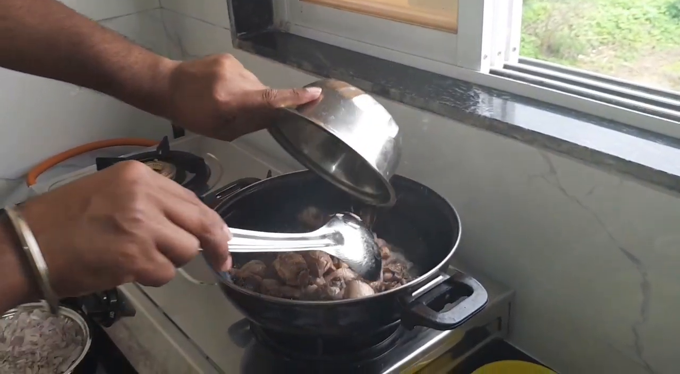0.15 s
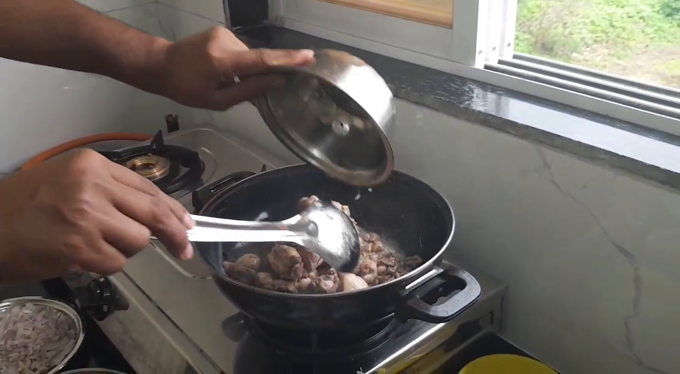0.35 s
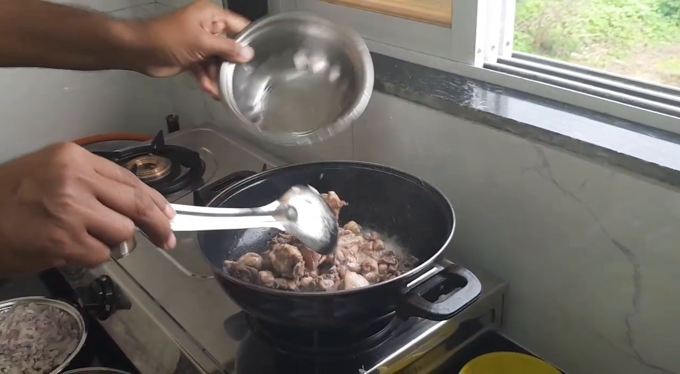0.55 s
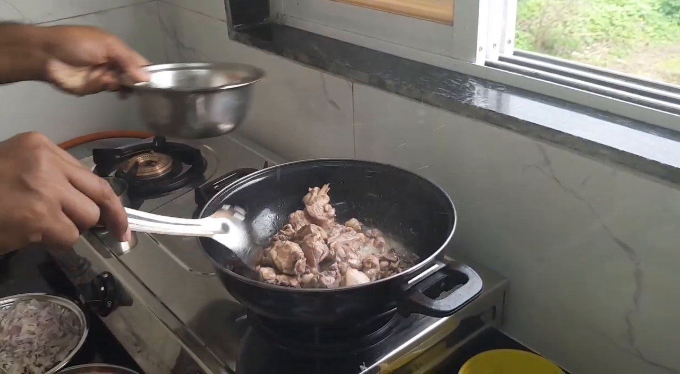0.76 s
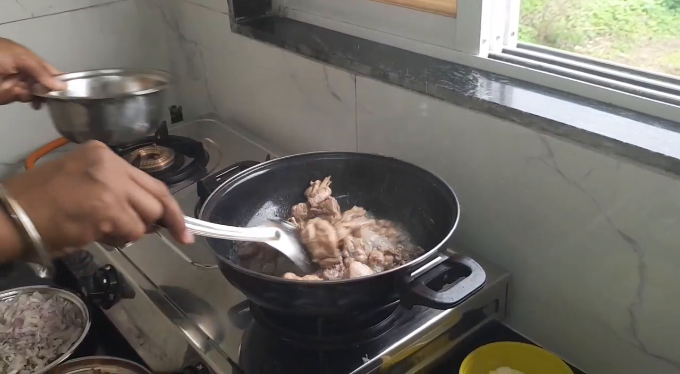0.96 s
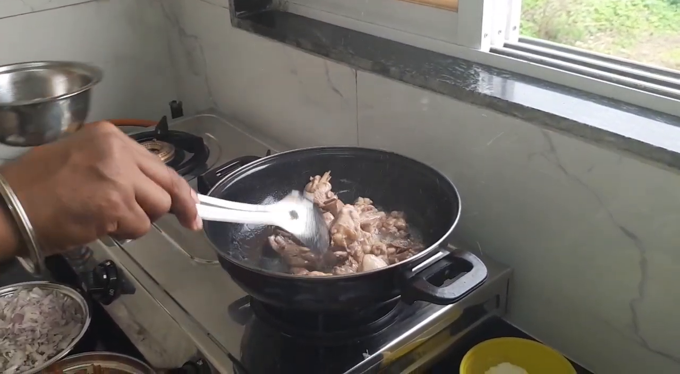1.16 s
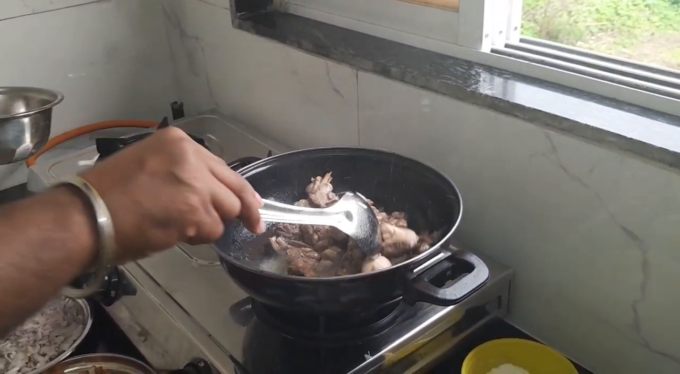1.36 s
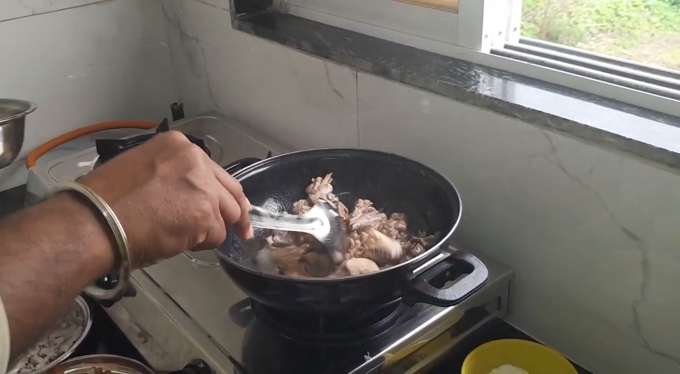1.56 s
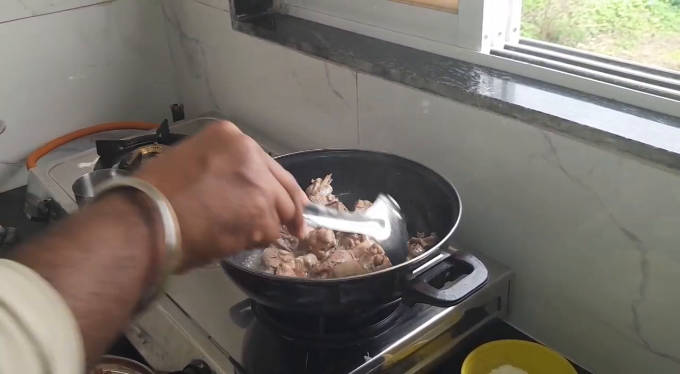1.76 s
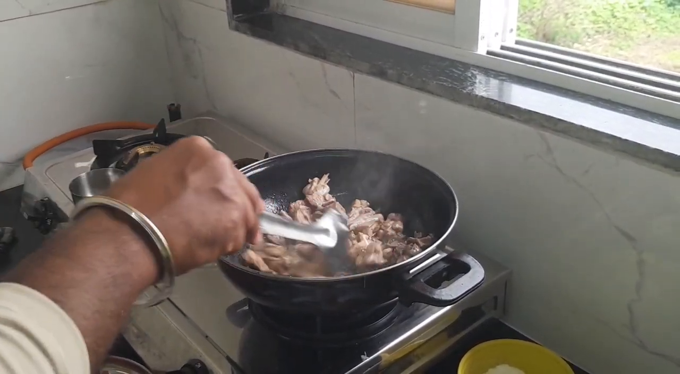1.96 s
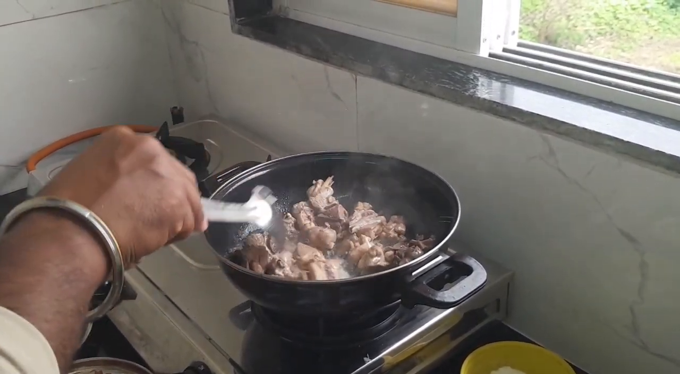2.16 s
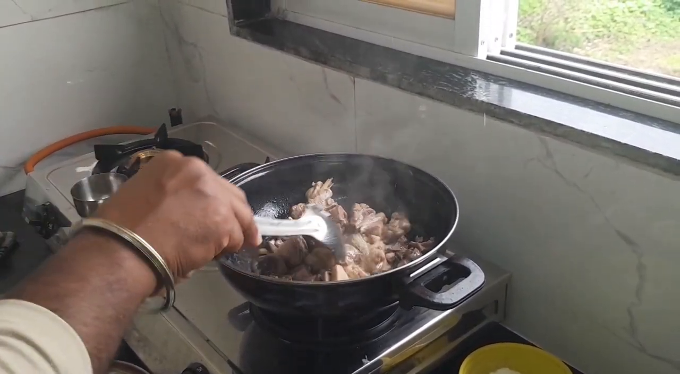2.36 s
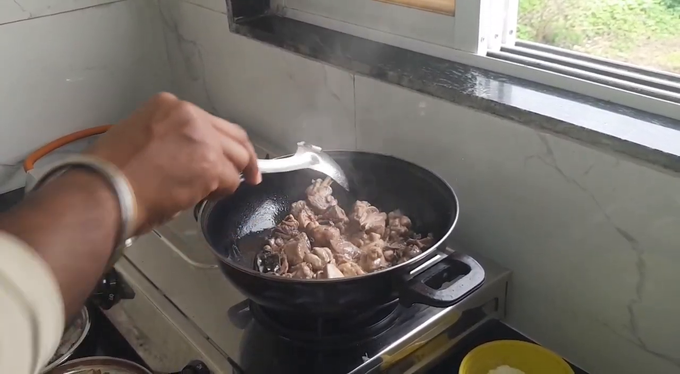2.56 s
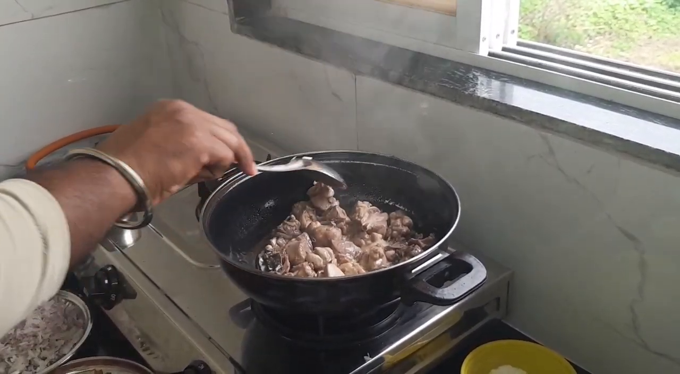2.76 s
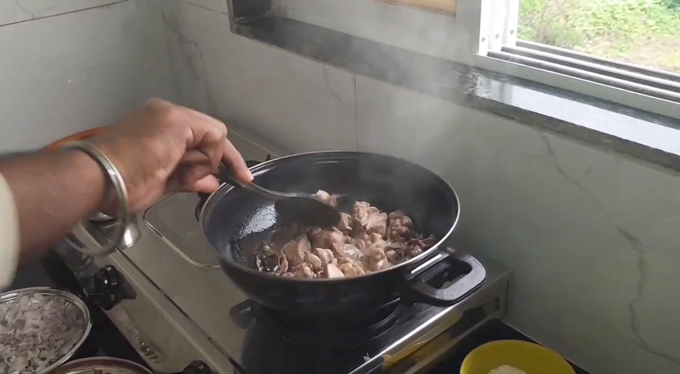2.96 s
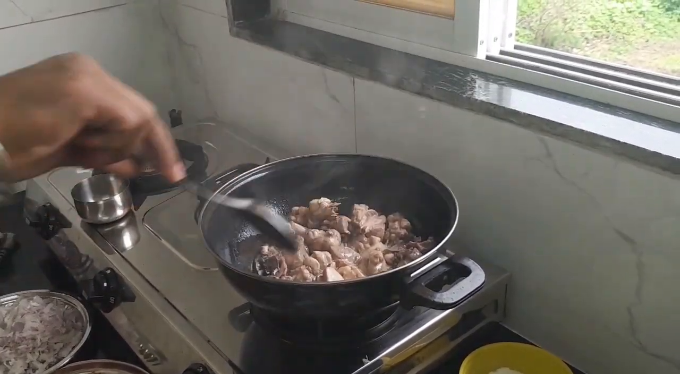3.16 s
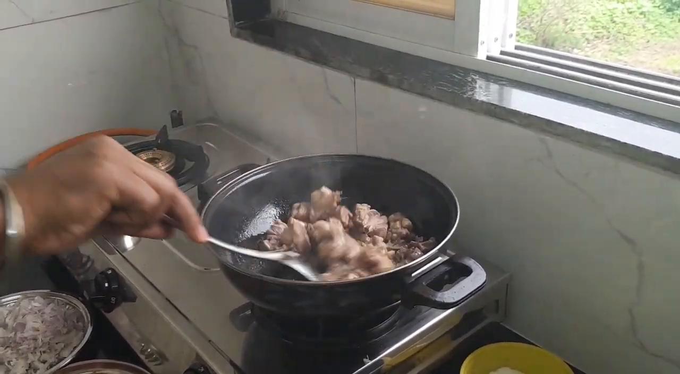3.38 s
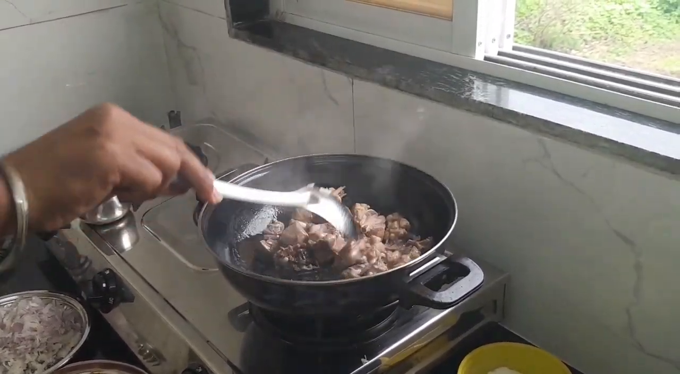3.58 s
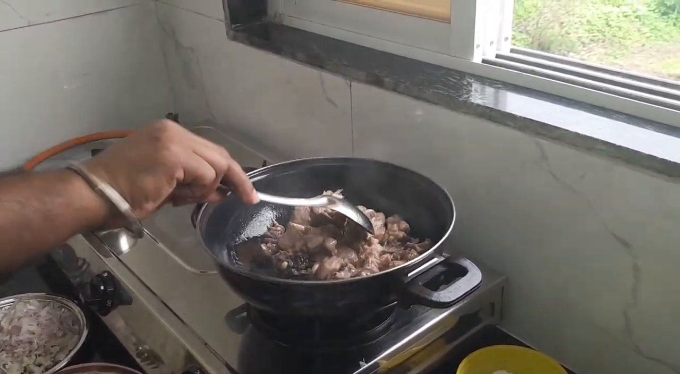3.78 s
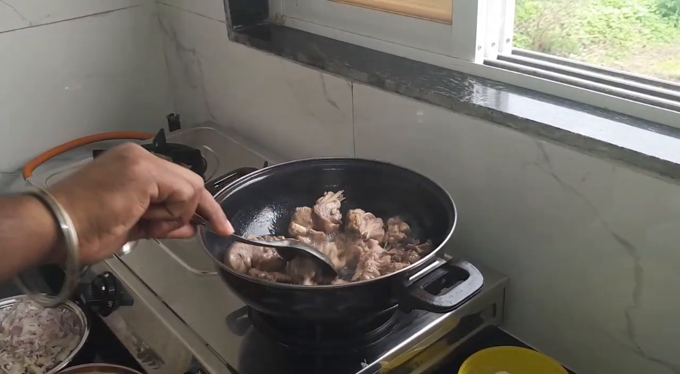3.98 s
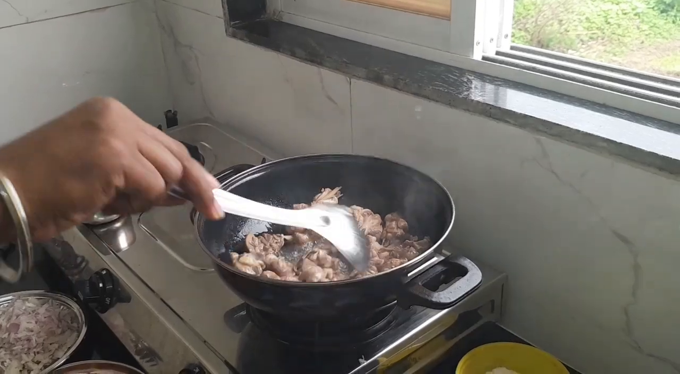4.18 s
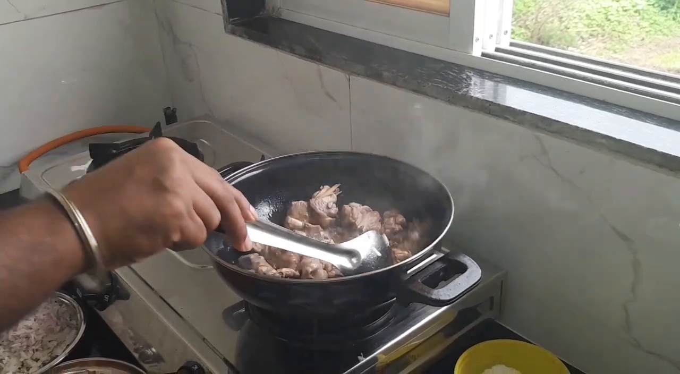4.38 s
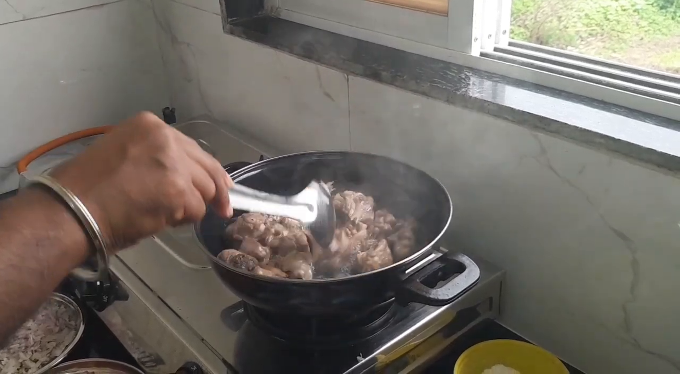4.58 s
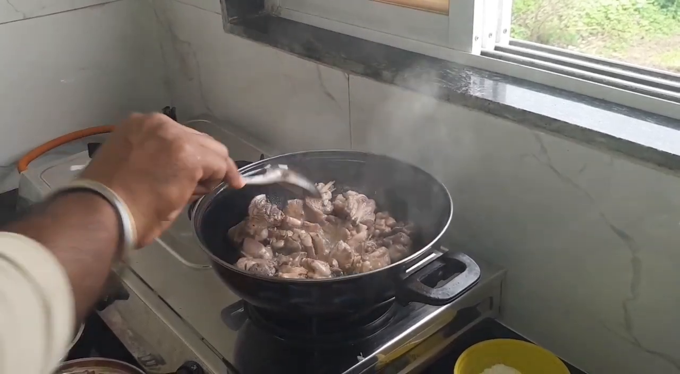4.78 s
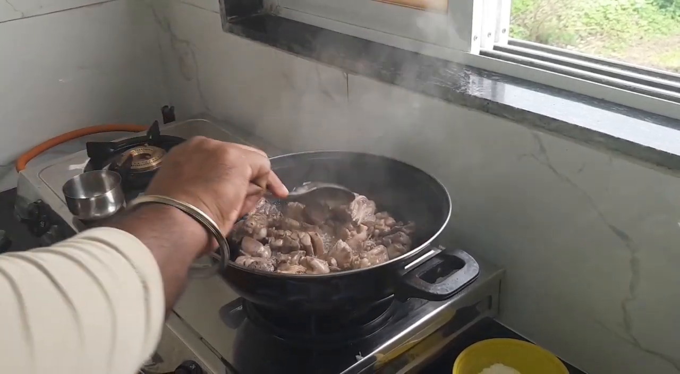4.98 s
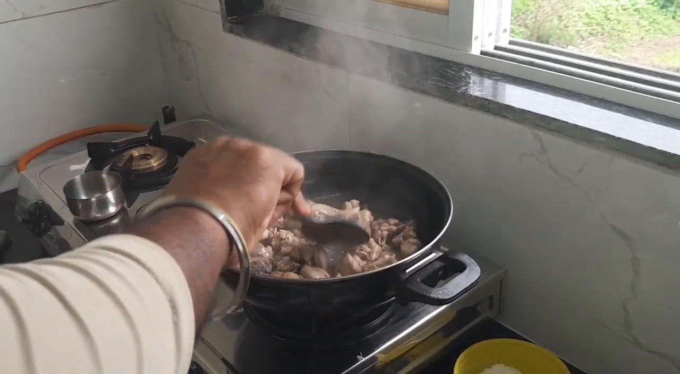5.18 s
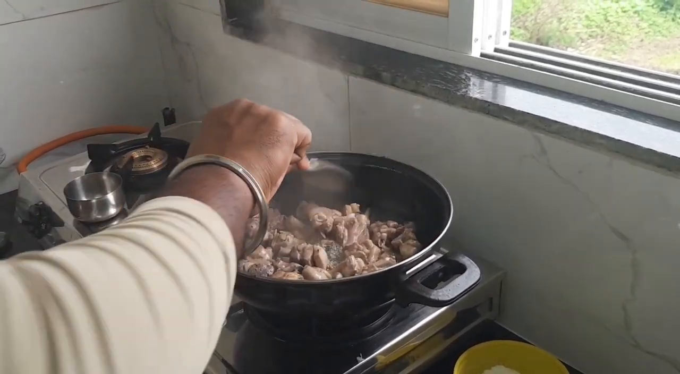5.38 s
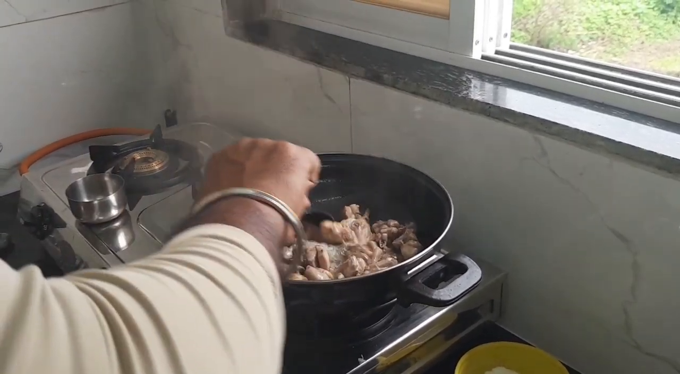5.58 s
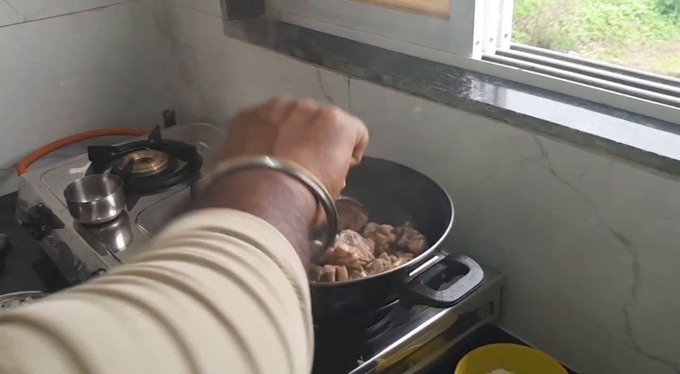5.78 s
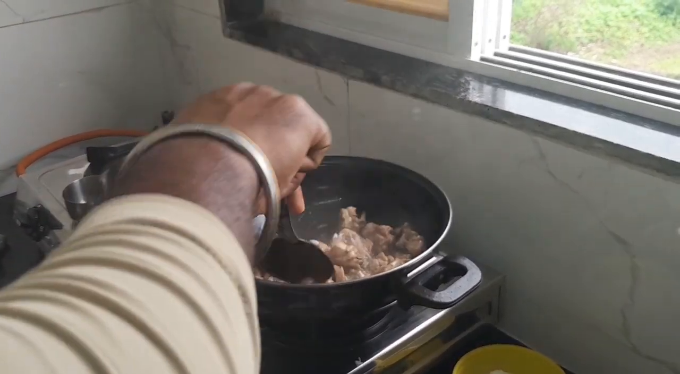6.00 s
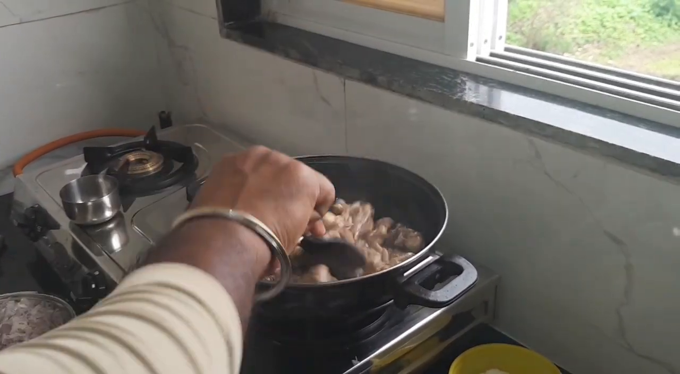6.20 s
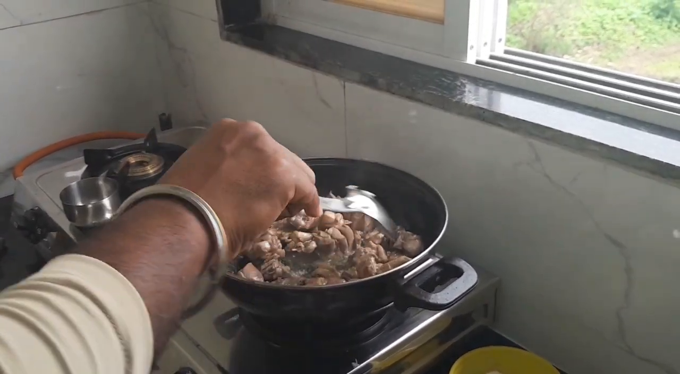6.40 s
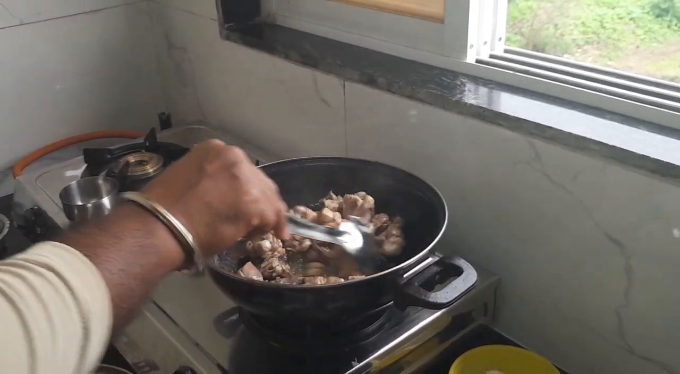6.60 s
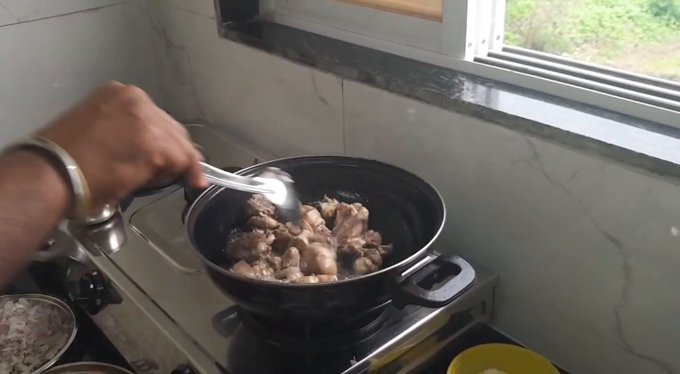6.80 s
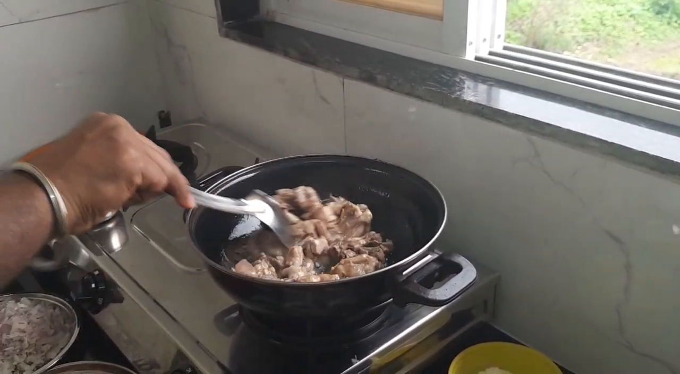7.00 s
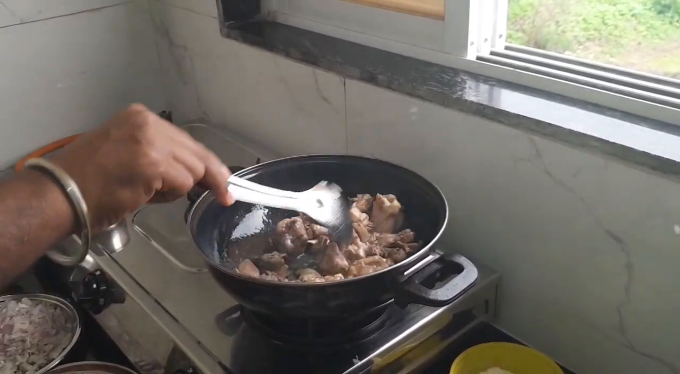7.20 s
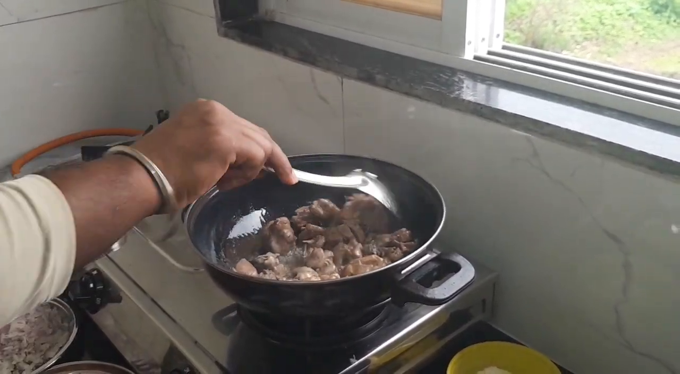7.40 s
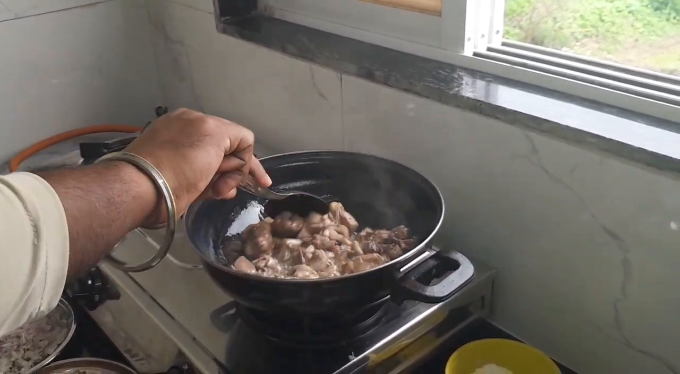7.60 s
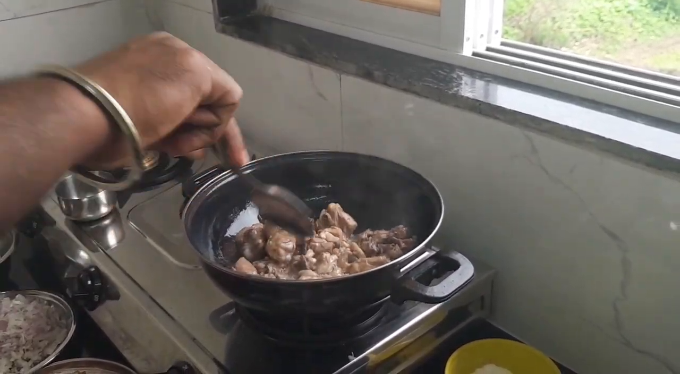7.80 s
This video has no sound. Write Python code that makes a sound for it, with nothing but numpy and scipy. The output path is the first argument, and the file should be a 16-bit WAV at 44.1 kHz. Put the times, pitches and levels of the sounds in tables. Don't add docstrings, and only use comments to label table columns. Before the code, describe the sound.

A loud, dense frying hiss is there from the start, strongest in the first second, as wet meat hits a hot deep pan close to a phone microphone. Fine crackle and bright droplet spits ride on it, with small wet squelches around 1 to 1.7 seconds. The sizzle falls steadily, becoming thinner and bubblier by 3 seconds. At about 3.25 a steel ladle rings sharply on the pan, followed by scrapes and popping bubbles; lighter taps come near 3.9 and 4.2 to 4.4, a splashing clink at 5.45, and duller knocks around 6.2 and 6.5 to 6.65, with a faint last one at 7.0. From 3 seconds, low draught gusts thump and flutter on the microphone, strongest until 4.5, returning around 5.2 to 6.2 and 7. Simmering frying continues quietly to the end near 7.9, in a short tiled-room echo over faint low rumble.

```python
import sys
import numpy as np
from scipy import signal
from scipy.fft import rfft, irfft, next_fast_len
from scipy.io import wavfile
from scipy.ndimage import uniform_filter1d, minimum_filter1d, map_coordinates

SR = 44100
rng = np.random.default_rng(int(sys.argv[2]) if len(sys.argv) > 2 else 0)


def log_audio(samples):
    frames = np.atleast_2d(samples).T
    limited = np.clip(frames, -1, 1)
    pcm = np.round(limited * 32767).astype(np.int16)
    wavfile.write(sys.argv[1], SR, pcm)


def boost(x):
    u = np.asarray(x, float) / 20
    return 10 ** u


N = 346185


def unit(x):
    return x / np.sqrt(np.mean(x ** 2) + 1e-20)


def noise():
    return rng.standard_normal(N)


def along(points, hz):
    f, value = np.transpose(points)
    return np.interp(np.log(hz + 1), np.log(f + 1), value)


def curves(rows):
    s, *columns = np.transpose(rows)
    return [np.interp(np.arange(N) / SR, s, column) for column in columns]


def wobble(rate_hz):
    return map_coordinates(rng.standard_normal(N // 100), [np.arange(N) * rate_hz / SR])


def coloured(x, spectrum):
    m = 2 * next_fast_len(N // 2 + 8192)
    gain = boost(along(spectrum, np.fft.rfftfreq(m, 1 / SR)))
    cepstrum = irfft(np.log(gain + 1e-6), m)
    cepstrum[1:m // 2] *= 2
    cepstrum[m // 2 + 1:] = 0
    return irfft(rfft(x, m) * np.exp(rfft(cepstrum)), m)[:N]


def resonate(x, modes):
    m = next_fast_len(N + 8192)
    f = np.fft.rfftfreq(m, 1 / SR)
    response = 0
    for k, (centre, width, db) in enumerate(modes):
        damping = 1j * f * width
        response = response + (-1) ** k * boost(db) * damping / (centre * centre - f * f + damping)
    return irfft(rfft(x, m) * response, m)[:N]


def patchy(x, patchy_db):
    z = signal.stft(x, nperseg=256)[2]
    field = uniform_filter1d(rng.standard_normal(z.shape), size=4, axis=0)
    field = uniform_filter1d(field, size=12, axis=1)
    return signal.istft(z * boost(patchy_db * unit(field)), nperseg=256)[1][:N]


def even(x, size):
    power = np.abs(uniform_filter1d(x ** 2, size=size))
    return unit(x / np.sqrt(power + 1e-12))


def bursts(count, spread_db):
    draw = rng.random((count, 3))
    size = np.sign(draw[:, 1] - 0.5) * boost(-spread_db * np.log(draw[:, 2] + 0.0028))
    return unit(np.bincount((draw[:, 0] * N).astype(int), size, N))


def bubbles(start_s, size, hz, cycles, glide):
    t = np.arange(384)[None] / SR
    turns = hz[:, None] * t
    age = turns / cycles[:, None]
    phase = 2 * np.pi * turns * (1 + glide[:, None] * np.minimum(age, 2))
    wave = size[:, None] * np.sin(phase) * age * np.exp(1 - 2 * age) * 2
    where = (start_s * SR).astype(int)[:, None] + np.arange(t.size)
    return np.bincount(where.ravel(), wave.ravel(), N + SR)[:N]


# pitch_hz, t60_s
WALL_DECAY = [(300, 0.61), (3000, 0.31), (12000, 0.24)]


def walls(x):
    hz, t, z = signal.stft(rng.standard_normal(SR // 2), SR, nperseg=256)
    decay = boost(-60 * t / along(WALL_DECAY, hz)[:, None])
    tail = signal.istft(z * decay, SR, nperseg=256)[1]
    delayed = np.pad(x, (130, 0))
    return signal.fftconvolve(delayed, tail / np.linalg.norm(tail))[:N]


# pitch_hz, level_db per Hz
SIZZLE_COLOUR = [(530, -46.5), (900, -17), (1140, -8), (1450, -11.5), (1680, -7.5), (3070, -0.5), (3590, 3),
                 (7200, -19), (9360, -53.5), (15800, -120)]


def sizzle(pops, spits):
    steam = patchy(noise(), patchy_db=1.33)
    return unit(coloured(steam + 0.5 * pops + 0.1 * spits, SIZZLE_COLOUR))


# time_s, pitch_hz
FROTH_PITCH = [
    (0, 1960),
    (2, 1986),
    (3.4, 2220),
    (4, 2700),
    (4.7, 2750),
    (5.5, 2385),
    (6.2, 2236),
    (7.85, 2365),
]


def froth():
    draw = rng.standard_normal((9000, 4))
    born_s = rng.random(len(draw)) * N / SR
    hz = np.interp(born_s, *np.transpose(FROTH_PITCH)) * np.exp(0.1717 * draw[:, 1])
    cycles = 6.1 * np.exp(0.33 * draw[:, 2])
    return unit(bubbles(born_s, boost(3.6 * draw[:, 0]), hz, cycles, 0.057 * draw[:, 3]))


# pitch_hz, width_hz, level_db
PAN_MODES = [(614, 76, -7.5), (699.5, 30, 1), (831, 54, -1.5), (1026, 26, -5), (1147, 65, -2.5),
             (1311, 70, -4.5), (1623, 61, -1), (1970, 95, -2.5), (2456, 62, -4.5)]


def pan_ring(pops, spits):
    drive = patchy(noise(), patchy_db=2.0) + 0.26 * pops + 0.12 * spits
    return unit(resonate(drive, PAN_MODES))


# pitch_hz, level_db per Hz
SPRAY_COLOUR = [(4000, -62.5), (6500, -0.5), (8000, -2.5), (11000, 4.5), (16000, 0), (20000, -1.5)]


def spray(pops, spits):
    mist = noise() + 0.71 * pops + 0.25 * spits
    return unit(coloured(mist * boost(0.7 * wobble(8.3)), SPRAY_COLOUR))


# time_s, boil_db, depth of the boil under the meat as depth_db
BOIL = [(0, -11, -1), (.35, -13, 3.5), (.76, -15.5, -1.5), (1.18, -16.5, 2), (1.77, -19, 2),
        (2.21, -20, -1), (2.58, -20.5, 1), (2.92, -21, 4), (3.41, -22, -1), (4.15, -23, 7),
        (4.45, -22.5, 0), (4.7, -23.5, -4), (5.22, -23.5, 5), (5.5, -24, 6.5), (6.01, -22.5, -9),
        (6.7, -23.5, -10), (7.22, -24, 0), (7.85, -25.5, -4)]


def frying():
    boil_db, depth_db = curves(BOIL)
    swell_db = boil_db + 22
    now = np.arange(N) / SR
    stirred = 1
    for tap in TAPS:
        since_s = now - tap[0]
        stirred = stirred + boost(tap[-1] + 11.5) * (since_s > 0) * np.exp(-np.abs(since_s) / 0.29)
    surge = unit(boost(0.2 * wobble(6.4) + 0.31 * wobble(18) + 0.34 * wobble(45)))
    pops = bursts(count=30000, spread_db=3.5)
    spits = bursts(count=600, spread_db=5.5)
    spits = spits + 0.4 * walls(spits)
    muffled_db = -11 * np.exp(-now / 0.42) - 0.8 * (now - 2)
    layers = boost(-20.25 + swell_db) * sizzle(pops, spits)
    layers += boost(-35 + swell_db + depth_db) * froth()
    layers += boost(-31.2 + swell_db + 0.22 * depth_db + muffled_db) * pan_ring(pops, spits)
    layers += boost(-32.5 + 1.2 * swell_db) * stirred * spray(pops, spits)
    return surge * layers


# pitch_hz, level_db per Hz
KITCHEN_COLOUR = [(35, -36.5), (60, -15), (108, -1.5), (168, -16.5), (233, 2.5), (317, -2.5), (366, 3.5),
                  (530, -4.5), (700, -3), (910, -29), (1540, -120)]
# pitch_hz, width_hz, level_db
ROOM_TONES = [(116, 7.9, 4.5), (244, 2.6, -2.5), (317, 16, -5.5), (392, 3, -8.5), (468.6, 21, 1.5)]


def kitchen():
    air = coloured(patchy(noise(), patchy_db=2.0), KITCHEN_COLOUR)
    return boost(-41) * unit(air + 1.1 * resonate(air, ROOM_TONES))


# start_s, peak_db
DROPLETS = [(0.0704, -33), (0.4104, -36), (0.5983, -28.5), (0.6907, -37.5), (1.1627, -34), (1.2422, -39.5),
            (1.7473, -45.5), (1.8353, -42.5), (2.111, -40.5), (2.345, -35), (2.5223, -36.5), (2.6693, -43),
            (2.787, -37.5), (3.1352, -56), (3.213, -42), (3.439, -42), (3.7363, -42), (3.7645, -44.5),
            (3.9438, -43.5), (4.0471, -46.5), (4.993, -45.5), (5.726, -45), (5.7926, -46), (6.7245, -43)]
# pitch_hz, level_db per Hz
SPLASH_COLOUR = [(4000, -56), (6500, -18.5), (8500, -9), (11000, 1), (16000, 0), (20000, -10)]


def droplets():
    ticks = np.zeros(N)
    s, db = np.transpose(DROPLETS)
    ticks[(s * SR).astype(int)] = boost(db + 30)
    t = np.arange(SR // 20) / SR
    fizz = signal.fftconvolve(ticks, boost(-12.5 - 60 * t / 0.033))[:N] * noise()
    return coloured(ticks + fizz, SPLASH_COLOUR)


# middle_s, eddies_db, half_length_s, flutter over eddies as over_db
GUSTS = [(0.88, -40, 0.042, -12), (1.207, -41, 0.25, -3), (1.66, -40.5, 0.098, -4), (2.683, -43, .2, -19),
         (2.995, -28, .12, -7), (3.131, -22, 0.028, 0.5), (3.236, -27.5, .05, -1), (3.359, -30.5, .06, -5),
         (3.521, -25.5, .08, -19.5), (3.713, -24, .07, -3), (3.848, -26.5, .08, -8.5),
         (4.015, -37.5, .06, 7.5), (4.24, -26.5, 0.056, -21), (4.373, -29, 0.032, -16),
         (4.452, -27, 0.038, -6), (4.647, -37.5, 0.13, -14), (5.06, -39.5, 0.16, 2),
         (5.243, -30.5, 0.054, 0), (5.4, -30, 0.13, 0), (5.524, -28, .04, -2), (5.686, -31, .09, -2.5),
         (5.814, -32, 0.075, 0.5), (6.011, -33.5, 0.056, -11), (6.201, -23.5, 0.094, -4),
         (6.449, -36.5, 0.18, -11), (6.773, -36.5, 0.057, 0), (6.992, -30, 0.11, -16),
         (7.148, -32.5, .04, -23), (7.68, -34, 0.22, -7.5), (7.84, -32.5, 0.035, -14)]
# pitch_hz, level_db per Hz
EDDY_COLOUR = [(13, -38.5), (22, -15.5), (42, -7), (59, 0), (76, -3.5), (130, -9), (170, -34.5),
               (290, -120)]
# start_s, peak_db, pitch_hz
PUFFS = [(3.118, -16.5, 113), (3.126, -17.5, 206), (3.204, -14.5, 121), (3.504, -12.5, 134),
         (3.712, -24.5, 106), (3.727, -12, 176), (3.734, -14.5, 262), (4.256, -34.5, 100),
         (4.454, -27, 111), (5.077, -24, 175), (5.447, -14.5, 102.5), (5.517, -22.5, 116),
         (5.804, -32, 250), (5.811, -13, 134), (6.188, -17.5, 136), (6.988, -21.5, 145)]


def draught():
    now = np.arange(0, N + 64, 64) / SR
    middle_s, gust_db, half_s, over_db = np.transpose(GUSTS)[:, :, None]
    fall_db = 22 * (np.abs(now - middle_s) / half_s) ** 1.8
    swell = boost(gust_db - fall_db)
    samples = np.arange(N) / SR
    eddy_gain = np.interp(samples, now, boost(-54.5) + swell.sum(0))
    flutter_gain = np.interp(samples, now, boost(-47.5) + (swell * boost(over_db)).sum(0))
    eddies = even(coloured(noise(), EDDY_COLOUR), size=2200)
    band = [(154.6, 143, 0)]
    flutter = even(resonate(resonate(noise(), band), band), size=1000)
    puffs, t = np.zeros(N + SR), np.arange(SR // 10) / SR
    for s, db, hz in PUFFS:
        age = t * hz / 0.84
        puff = age ** 2 * np.exp(-2 * age) * np.sin(2 * np.pi * hz * t) * 4
        puffs[round(s * SR):][:len(t)] += boost(db + 2.5) * puff
    lumpy_eddies = eddy_gain * boost(2.5 * wobble(25) - 1.3) * eddies
    lumpy_flutter = flutter_gain * boost(2.6 * wobble(34) - 6.0) * flutter
    return lumpy_eddies + lumpy_flutter + puffs[:N]


# start_s, length_s, first_pitch_hz, last_pitch_hz, level_db
SQUELCHES = [(0.971, .04, 1770, 1500, -19.5), (1.12, .04, 1500, 1300, -42), (1.37, 0.034, 2100, 1900, -18),
             (1.482, 0.015, 2330, 2000, -19.5), (1.6, .02, 1500, 1310, -28.5),
             (1.656, .02, 2720, 2400, -17), (3.307, .03, 3340, 2200, -22.5), (3.342, .065, 4200, 3100, -18),
             (3.434, .023, 3950, 1690, -17.5), (4.229, .06, 600, 450, -32.5),
             (4.256, 0.039, 3700, 2700, -24), (5.455, .1, 900, 600, -29), (5.703, .03, 3600, 2800, -21),
             (5.738, 0.011, 2350, 2150, -19), (5.81, 0.035, 3050, 3980, -21),
             (6.132, .06, 2180, 1890, -22.5), (6.64, .039, 1080, 850, -29.5), (7.02, .11, 500, 450, -34.5),
             (7.588, .09, 596, 302, -33)]


def stirring():
    s, length, first_hz, last_hz, db = np.transpose(SQUELCHES)[:, :, None]
    place = rng.random((len(SQUELCHES), 40))
    draw = rng.standard_normal((2, len(SQUELCHES), 40))
    scatter = np.minimum(0.49, (520 / first_hz) ** 2)
    hz = (first_hz * (last_hz / first_hz) ** place * np.exp(scatter * draw[0])).ravel()
    size = boost(db - 3.6 * place + 2.1 * draw[1]) * np.sqrt(length / 0.05)
    born_s = (s + length * place).ravel()
    return bubbles(born_s, size.ravel(), hz, (hz / 700) ** 0.99, np.zeros(hz.size))


# start_s, peak_db, pitch_hz, decay in cycles
BLOPS = [(1.5205, -9, 3710, 11), (2.2633, -8, 3770, 10), (2.6339, -12, 3700, 10), (3.2151, -9.5, 2186, 8.3),
         (3.3605, -3, 3720, 9.7), (3.4535, -5.5, 2100, 5.4), (4.8345, -20, 3420, 6.3),
         (6.0463, -10, 3310, 15), (6.5897, -10.5, 2490, 8.3), (6.6024, -9.5, 3820, 9),
         (6.754, -8, 3320, 7.8)]


def blops():
    s, db, hz, cycles = np.transpose(BLOPS)
    return bubbles(s, boost(db - 5), hz, cycles, np.full(len(s), -0.03))


# start_s, steel_db, pan_knock_db, crack_db, splash_db
TAPS = [(3.254, -7, -38, -11, -20), (3.3087, -42, -46, -19, -39), (3.3465, -22, -15, -13, -24),
        (3.865, -35, -26, -16, -35), (4.2278, -20, -24, -6.5, -24), (4.259, -26, -19, -13, -34),
        (4.3538, -37, -31, -18, -16), (5.4518, -19.5, -16.5, -12, -16), (6.165, -38.5, -20, -18, -34),
        (6.543, -22, -32, -20.5, -31), (6.6135, -32, -14.5, -16, -28), (6.62, -41, -13, -36.5, -38.5),
        (6.643, -48, -18.5, -34, -40.5), (7.022, -34.5, -25, -32.5, -30.5)]
# pitch_hz, level_db, t60_s
STEEL_MODES = [(2560, -3, .03), (3040, -5, 0.023), (3420, 0.5, 0.044), (3860, -9, 0.04), (3970, -9, .035),
               (4560, 2, 0.055), (5300, -15, .04), (5880, -6, 0.041), (6550, -12, 0.047), (7150, -20, .04),
               (8700, -26, .05), (11500, -25, .07), (12100, -30, .15), (13100, -14, .06), (14970, -10, .07)]
# pitch_hz, level_db per Hz
BLOW_COLOUR = [(200, -37), (600, -20), (1500, 0), (3600, 1), (7000, -7), (10000, -24.5), (16000, -10.5)]


def ladle():
    steel, cracks, splash = np.zeros((3, N + SR))
    knocks, t = np.zeros(N), np.arange(SR // 4) / SR
    for s, steel_db, knock_db, crack_db, splash_db in TAPS:
        i = round(s * SR)
        ring = 0
        for hz, db, t60 in STEEL_MODES:
            ring = ring + boost(db + rng.normal(0, 1) - 60 * t / t60) * np.sin(2 * np.pi * hz * t)
        steel[i:][:len(t)] += boost(steel_db) * ring * (1 - np.exp(-t / 0.0013))
        knocks[i] = boost(knock_db + 38.5)
        crack_fade = boost(-60 * t / 0.045) + 0.99 * boost(-60 * t / 0.0095)
        cracks[i:][:len(t)] += boost(crack_db) * crack_fade * rng.standard_normal(len(t))
        splash_t60 = 0.1 * boost(0.45 * (splash_db + 16.5))
        splash[i:][:len(t)] += boost(splash_db - 60 * t / splash_t60) * rng.standard_normal(len(t))
    knocked = resonate(knocks, PAN_MODES[:6])
    cracked = boost(1.5) * coloured(cracks[:N], BLOW_COLOUR)
    return steel[:N] + knocked + cracked + coloured(splash[:N], SPLASH_COLOUR)


def scene():
    steady = frying() + kitchen()
    close = droplets() + stirring() + blops() + ladle()
    echo = boost(-14) * walls(steady) + boost(-9) * walls(close)
    return (steady + close + echo + draught())[None]


def low_pass(x):
    return signal.sosfilt(signal.butter(12, 15700, fs=SR, output="sos"), x)


# pitch_hz, level_db
PHONE_RESPONSE = [(20, -12.5), (45, 0), (6800, -1.5), (7600, -3.5), (8400, -13.5), (9300, -19),
                  (10200, -30), (11000, -25.5), (12000, -17), (13000, -28), (14200, -26.5), (15700, -21.5)]


def record(dry):
    heard = coloured(dry[0], PHONE_RESPONSE)
    room_left = np.minimum(1, 0.93 / (np.abs(heard) + 1e-9))
    room_left = minimum_filter1d(room_left, size=301)
    held = heard * uniform_filter1d(room_left, size=151)
    return low_pass(held[None])


dry = scene()
out = record(dry)
log_audio(out)
```